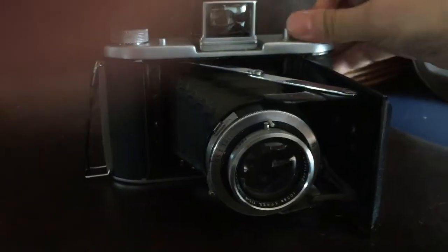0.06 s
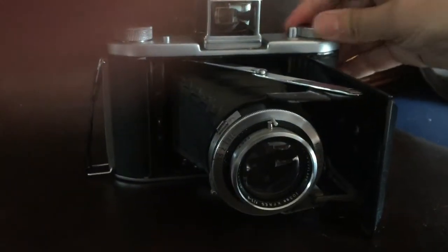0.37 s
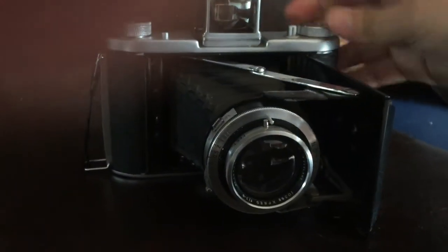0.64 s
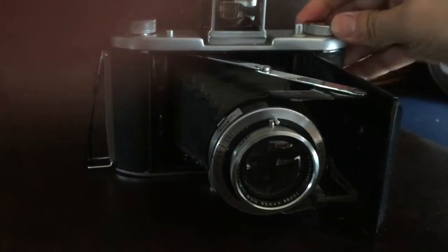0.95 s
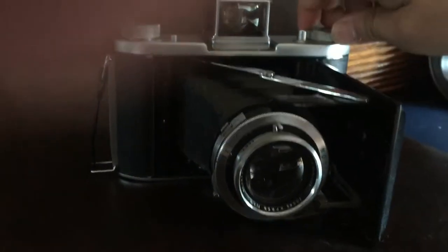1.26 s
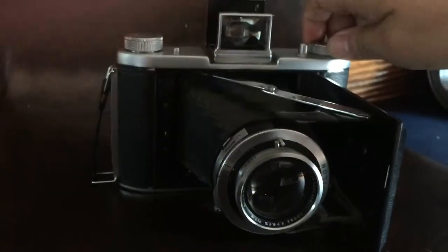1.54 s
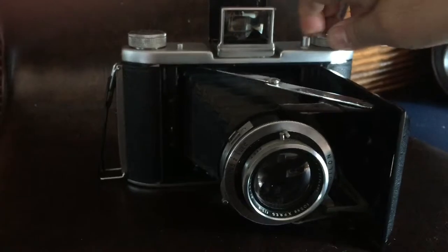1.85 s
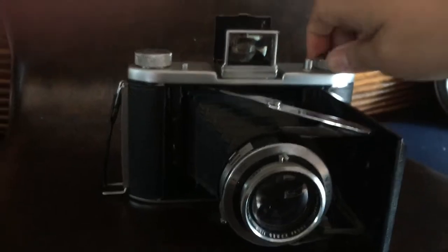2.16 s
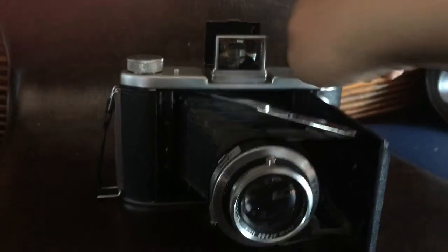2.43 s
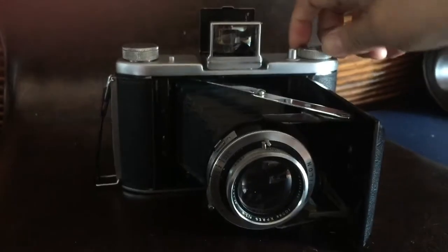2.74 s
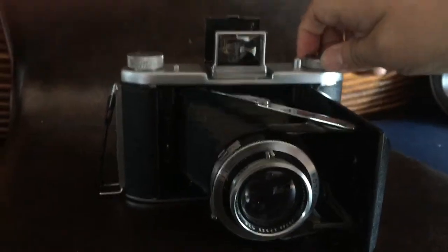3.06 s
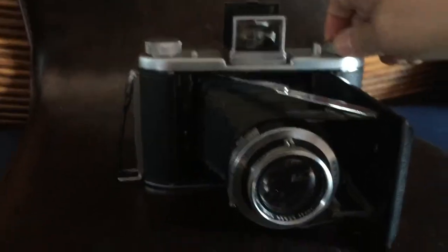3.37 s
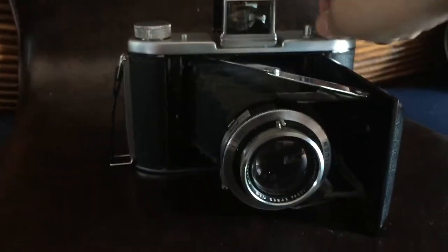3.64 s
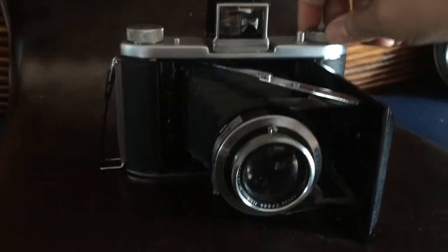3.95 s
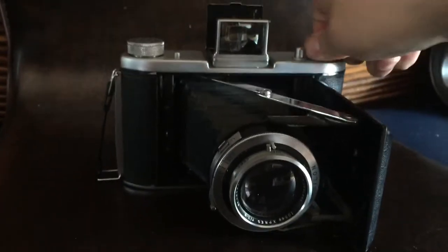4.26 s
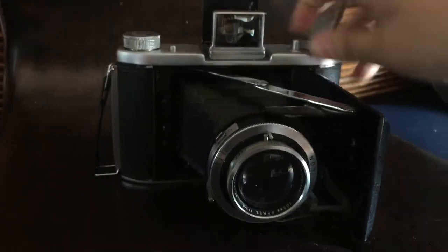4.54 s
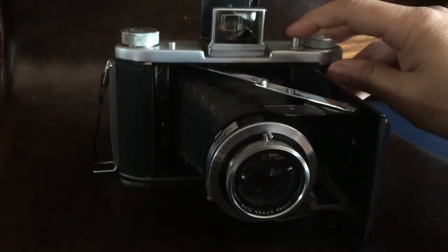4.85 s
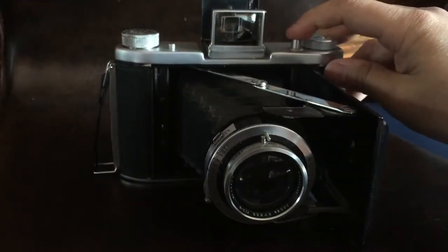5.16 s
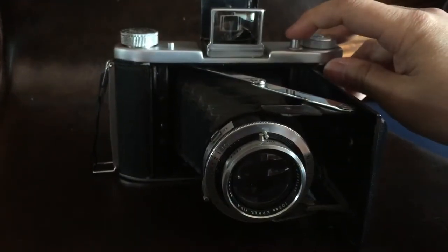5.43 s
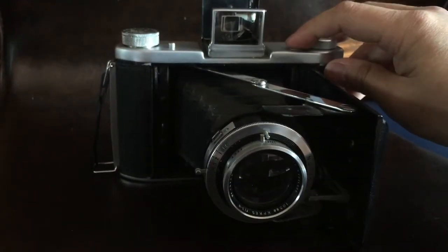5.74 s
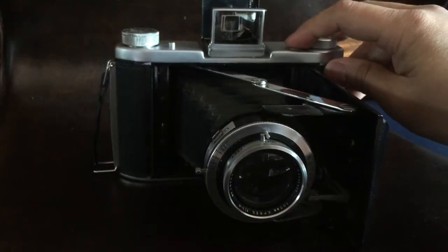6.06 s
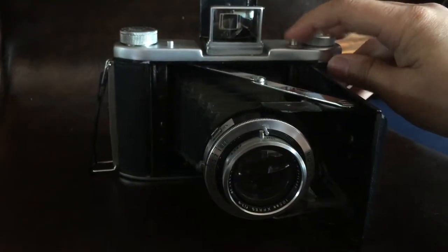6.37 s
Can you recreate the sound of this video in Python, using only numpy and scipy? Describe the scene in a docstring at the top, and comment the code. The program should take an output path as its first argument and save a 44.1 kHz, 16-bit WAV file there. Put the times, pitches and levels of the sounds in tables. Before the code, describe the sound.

Close, quiet handling of an old camera on a table, with small clicks, scrapes and knocks leading to a sharp mechanical shutter release.

```python
"""Soft rubs, scrapes and metal ticks come first: fingers wind the knob of an old folding camera,
close by in a quiet room. The body bumps, rocks and drags on the table. Near the end the shutter
blades snap open, a tiny clockwork timer (the escapement) buzzes, and the blades snap shut.
The gears run back, then the release button springs back with a click and a faint ring."""
import sys
import numpy as np
from scipy import signal
from scipy.fft import rfft, irfft
from scipy.io import wavfile
from scipy.ndimage import uniform_filter1d

SR = 44100
rng = np.random.default_rng(int(sys.argv[2]) if len(sys.argv) > 2 else 0)


def generate_wav(signal):
    """Clip the signal to [-1, 1] and save it as 16-bit WAV at the path in sys.argv[1]."""
    frames = np.transpose(np.atleast_2d(signal))
    scaled = np.clip(frames, -1, 1) * 32767
    pcm = np.round(scaled).astype(np.int16)
    wavfile.write(sys.argv[1], SR, pcm)


N = 291060
TIME = np.arange(N) / SR


def amp(db):
    """Turn decibels into a number to multiply by."""
    return 10 ** (np.asarray(db) / 20)


def evened(x):
    """Scale a sound to an average (rms) level of one."""
    return x / np.sqrt(np.mean(x ** 2) + 1e-20)


def value_at(points, hz):
    """Join (Hz, value) points into a curve and look up the given pitches."""
    point_hz, values = np.transpose(points)
    return np.interp(np.log(hz + 1), np.log(point_hz), values)


def coloured(x, points):
    """Shape a sound's tone with (Hz, dB) points, then even its level."""
    gain = amp(value_at(points, np.fft.rfftfreq(len(x), 1 / SR)))
    return evened(irfft(rfft(x) * gain, len(x)))


def add(mix, start_s, sound):
    """Add a sound into the mix at the given time."""
    part = mix[max(round(start_s * SR), 0):][:len(sound)]
    part += sound[:len(part)]


def background(air_db=-61, hum_hz=59, hum_width_hz=9, hum_db=-66):
    """Faint room air with a low, unsteady hum."""
    # The tone of the air. Each row: pitch in Hz, relative level in dB.
    air_tone = [(12, -61.5), (20, -32), (39, -8.5), (60, 1.5), (77, -5), (91, -22), (123, -10.5),
                (177, -25), (499, -26.5), (624, -27.5), (678, -29.5), (759, -29), (1030, -27),
                (1290, -29.5), (16000, -46.5)]
    hz = np.fft.rfftfreq(N, 1 / SR)
    hum_band = np.exp(-((hz - hum_hz) / hum_width_hz) ** 2)
    hum = irfft(rfft(rng.standard_normal(N)) * hum_band, N)
    return amp(air_db) * coloured(rng.standard_normal(N), air_tone) + amp(hum_db) * evened(hum)


def housing_ring(ring_db, scatter_db=0, part_notes=()):
    """One click and the ring it leaves in the metal; the mix of notes depends on where it is struck."""
    # The housing's notes. Each row: pitch in Hz, dB above the click, seconds to fade by 60 dB.
    housing = [(916, 7, .025), (1740, 9, 0.038), (1867.5, 14, 0.033), (1900, -2, .24), (2125, 3, 0.038),
               (2180, -2.5, 0.35), (2273, 8.5, 0.035), (3120, 4.5, 0.026), (3580, -0.5, 0.037),
               (3795, 8.5, 0.027), (4000, 1, 0.024), (4300, 6.5, .025), (4760, -3.5, 0.057),
               (5357, 1, 0.028), (5470, 2, .04), (8370, 4.5, 0.0074), (8880, 10, .012), (12520, 3, 0.0052)]
    t = TIME[:SR // 5]
    response = signal.unit_impulse(len(t))
    shifts_db = ring_db + scatter_db * rng.standard_normal(len(housing))
    notes = [(hz, db + shift, fade_s) for (hz, db, fade_s), shift in zip(housing, shifts_db)]
    for hz, db, fade_s in notes + list(part_notes):
        damping = np.log(1000) / fade_s
        response += amp(db) * 2 * damping / SR * np.exp(-damping * t) * np.cos(2 * np.pi * hz * t)
    return response


def slips(per_s, spread_db, hiss):
    """Friction: tiny slips of uneven size over a smooth hiss."""
    size = amp(spread_db * np.minimum(rng.exponential(1, N), 4))
    slipping = rng.random(N) < per_s / SR
    return evened(size * slipping * rng.choice([-1., 1.], N)) + hiss * rng.standard_normal(N)


def stroke(start, length, attack_s=0.018, sag_db_per_s=21.5, release_s=0.02):
    """The pressure of one sliding movement: it swells, slackens and lets go."""
    t = np.maximum(TIME - start, 0)
    swell = np.minimum(t / attack_s, 1)
    let_go = np.exp(-np.clip(t - length, 0, 1) / release_s)
    return swell * amp(-sag_db_per_s * t) * let_go


def rubbing():
    """Dragging and gripping the body gives a dull, lumpy rub."""
    # The tone of the rub. Each row: pitch in Hz, relative level in dB.
    rub_tone = [(30, -4.5), (70, 9.5), (150, 8.5), (300, 4.5), (500, -17), (750, -28.5), (1200, -30.5),
                (3000, -45.5)]
    return coloured(slips(per_s=110, spread_db=4, hiss=0.66), rub_tone)


def scraping(tilt_db, pivot_hz=2500):
    """Fine slips at the knob make the metal ring; a harder edge sounds brighter."""
    # The tone of the scrape. Each row: pitch in Hz, relative level in dB.
    scrape_tone = [(150, -24), (500, -4), (900, -0.5), (1900, -1.5), (3500, -2.5), (6500, -7.5),
                   (10000, -14), (16000, -14.5)]
    friction = slips(per_s=6000, spread_db=2, hiss=1)
    grains = signal.fftconvolve(friction, housing_ring(ring_db=-5))[:N]
    hz, t, spectrum = signal.stft(coloured(grains, scrape_tone), SR, nperseg=256)
    octaves = np.log2(np.maximum(hz, 900) / pivot_hz)[:, None]
    gain = amp(octaves * np.interp(t, TIME, tilt_db))
    power = np.mean(abs(spectrum) ** 2, axis=1, keepdims=True)
    gain /= np.sqrt((power * gain ** 2).sum(0) / power.sum())  # brighter, but no stronger
    return signal.istft(spectrum * gain, SR)[1][:N]


def fingers(grip_rub_db=-72.5, grip_scrape_db=-83.5):
    """Each stroke rubs the body and scrapes the knob; the resting hand does both faintly."""
    # Finger strokes. Each row: start and length in seconds, rub and scrape levels in dB,
    # brightness in dB per octave.
    strokes = [(-.02, 0.0372, -122, -60, 1.5), (0.027, 0.089, -67, -55, 0.5),
               (.205, 0.052, -53.5, -58, -7.5), (0.293, 0.078, -48, -73, -5), (.435, 0.092, -64, -58, 0.5),
               (0.504, 0.097, -49.5, -56, -6), (0.659, 0.057, -50.5, -58, -6),
               (1.305, 0.066, -48, -71.5, -4), (1.468, 0.036, -52.5, -59.5, -1.5),
               (1.528, 0.34, -67.5, -75.5, -6), (1.843, 0.065, -60.5, -66, -1.5),
               (2.036, 0.04, -53, -68, -12), (2.157, 0.246, -61, -67, -3.5), (2.395, 0.15, -47.5, -59, -4),
               (2.637, 0.13, -76, -69.5, 0.5), (2.932, 0.33, -59, -78, -2), (3.229, 0.085, -50, -66, 0.5),
               (3.326, 0.11, -51.5, -79, -11), (3.488, .15, -50.5, -79, -9), (3.72, 0.119, -69, -83, 4),
               (4.038, 0.02, -64.5, -77, 0), (4.138, 0.26, -70, -71.5, -0.5), (4.543, 0.18, -66.5, -67, 1),
               (5.172, 0.077, -62, -62.5, -7), (5.71, .025, -57, -48, -2), (6.455, .04, -60, -52, -1),
               (6.496, 0.08, -60, -61, -1.5)]
    pressure = np.array([stroke(start, length) for start, length, *_ in strokes])
    rub_db, scrape_db, tilt_db = np.transpose(strokes)[2:]
    rub = amp(rub_db) @ pressure + amp(grip_rub_db)
    scrape = amp(scrape_db) @ pressure + amp(grip_scrape_db)
    brightness = (tilt_db * amp(scrape_db)) @ pressure / scrape
    return rub * rubbing() + scrape * scraping(brightness)


def contact(blow, ring_db, part_db, scatter_db, rattle_db, rattle_ms=8, part_fade_s=0.03):
    """Metal hits metal: gritty chatter and a faint rattle ring the housing and the struck part."""
    rise_ms, decay_ms, db, hz, below_db, above_db = blow
    # The borders in Hz between the bands of a click, from bass to treble.
    edges_hz = [150, 780, 1550, 2800, 6500, 11000, 16000]
    ring = housing_ring(ring_db, scatter_db, [(hz, part_db, part_fade_s)])
    ms = TIME[:len(ring)] * 1000
    after = np.maximum(ms - rise_ms, 0)
    dying = np.exp(-after / decay_ms) + amp(rattle_db) * np.exp(-after / rattle_ms)
    force = np.minimum(ms / rise_ms, 1) ** 2 * dying
    grit_db = evened(uniform_filter1d(rng.standard_normal(len(ms)), size=40))
    chatter = force * amp(grit_db) * rng.standard_normal(len(ms))
    burst = signal.fftconvolve(chatter, ring)[:len(ms)]
    out = np.zeros(len(ms))
    for low, high in zip(edges_hz, edges_hz[1:]):  # bands near the part's pitch are loudest
        octaves = np.log2(np.sqrt(low * high) / hz)
        fall_db = max(-octaves * below_db, octaves * above_db)
        band = signal.sosfilt(signal.butter(4, [low, high], "band", fs=SR, output="sos"), burst)
        level_over_10ms = np.sqrt(np.sum(band ** 2) / (0.01 * SR))
        out += amp(db - fall_db) * band / level_over_10ms
    return out


def clicks(rows, ring_db, part_db, rattle_db):
    """Play a list of contacts, each at its own spot on the metal."""
    out = np.zeros(N)
    for start, *blow in rows:
        add(out, start, contact(blow, ring_db, part_db, scatter_db=1, rattle_db=rattle_db))
    return out


def handling_ticks():
    """The knob, levers, fingernails and release button tick against metal."""
    # Small contacts. Each row: start in seconds, rise and decay in ms, level in dB, pitch in Hz,
    # fall below and above that pitch in dB per octave.
    ticks = [(.068, 4, 2.4, -49, 1940, 11, 9), (.0997, 1.35, 2.3, -30, 6070, 12.5, 22.5),
             (.1527, 0.71, 4, -44, 1760, 17.5, 35), (.2439, 0.2, 3.1, -28.5, 3450, 9, 13),
             (.5017, 0.72, 4.7, -39.5, 2100, 3.5, 4.5), (.536, 1.1, 1.9, -26.5, 5340, 6.5, 11.5),
             (.6475, 1.3, 10, -50, 1390, 7, 8.5), (.6694, 0.244, 2.6, -40, 4077, 5, 15),
             (.6902, 0.41, 3.2, -36, 1780, 9, 12), (.7047, 2.7, 1.8, -40.5, 1750, 9, 12.5),
             (.8917, 3.45, 4, -64, 3500, 9, 16), (1.28, 14.3, 5.7, -51, 940, 5, 5.5),
             (1.8967, 3.5, 5.4, -61, 6000, 5, 5), (2.032, 11, 10, -51.5, 2180, 4, 7),
             (2.041, 4.3, 3.2, -48, 8840, 26, 34), (2.0857, 6.4, 8, -54.5, 2600, 4, 10.5),
             (2.411, 4.66, 4.1, -37.5, 1335, 2.5, 11.5), (2.4735, 1.47, 2.3, -52.5, 1200, 2, 14),
             (2.539, 6.5, 3, -54, 1980, 11, 10), (2.6587, 1.6, 3.9, -62.5, 4444, 4, 15.5),
             (2.6837, 2.2, 4, -62.5, 4470, 8, 10.5), (3.7357, .3, .9, -68.5, 7070, 11, 10),
             (3.8137, 3.3, 9.6, -50.5, 990, 10, 11), (4.0257, 5.6, 16, -50, 1650, 7, 8),
             (4.586, 3.4, 2.3, -46, 2270, 7.5, 8.5), (4.5957, 0.91, 5.44, -43, 1360, 10.5, 10),
             (4.6478, 0.46, 2, -41, 2050, 17, 7.5), (4.6537, 1.2, 5.9, -49.5, 2100, 4, 4.5),
             (4.7027, 5.4, 5.3, -52.5, 4990, 6, 8), (5.1757, 0.33, 1.7, -41, 1370, 5, 8.5),
             (5.6787, 7, 12.7, -56, 1650, 2.5, 8), (6.4835, 5.2, 6.67, -34.5, 2350, 10, 4),
             (6.4934, 2.1, 2.94, -35.5, 2350, 4.5, 3.5)]
    return clicks(ticks, ring_db=-12, part_db=4.5, rattle_db=-27)


def bumps(bass_share=0.56, spread_ms=1.95):
    """Bending waves carry treble faster than bass, so each bump is a quick falling chirp."""
    # Knocks on body and table. Each row: time in seconds, peak in dB, centre pitch in Hz,
    # softness (higher means less treble).
    knocks = [(0.223, -44, 345, 4.8), (.301, -31.5, 223.4, 3.3), (.311, -35, 167, 4), (.338, -41.5, 230, 5),
              (0.368, -46, 140, 5), (.443, -42.5, 151, 2.6), (.536, -36, 150, 0.8), (1.333, -34, 200, 5.5),
              (1.34, -31, 243, 3.11), (1.463, -46, 170, 6.4), (1.497, -39.5, 94, 8.2),
              (1.916, -44.5, 161, 4.2), (2.05, -41, 70, 4.5), (2.419, -36.5, 228, 8.4),
              (2.466, -38.5, 210, 2.5), (2.662, -46, 160, 6.8), (3.191, -34, 128, 3.37),
              (3.2452, -27.5, 340, 2), (3.2575, -16.5, 193, 1.456), (3.523, -43, 137.1, 11),
              (3.61, -39, 170, 3.9), (5.1762, -14.5, 1450, 4.05), (5.178, -37, 240, 1.36),
              (5.188, -39.5, 220, 1.7), (5.737, -20.5, 225, 1.7), (5.82, -39.5, 260, 1.3),
              (6.252, -52.5, 120, 4.5), (6.496, -54, 336, 2.6), (6.566, -49, 130, 3)]
    out = np.zeros(N)
    hz = np.fft.rfftfreq(8192, 1 / SR)
    for at, db, centre_hz, softness in knocks:
        smear_ms = spread_ms * (200 / centre_hz) ** 0.35  # deeper knocks last longer
        ratio = hz / centre_hz
        gain = ratio ** (bass_share * softness) / (1 + ratio ** ((1 + bass_share) * softness))
        lag_turns = 2 * smear_ms * np.sqrt(hz / 1000)
        chirp = np.fft.fftshift(irfft(gain * np.exp(-2j * np.pi * lag_turns)))
        add(out, at - len(chirp) / 2 / SR, amp(db) * chirp / abs(chirp).max())
    return out


def rings(rows, rise_s):
    """Pure notes that swell briefly and die away."""
    out = np.zeros(N)
    t = TIME[:SR]
    for start, db, hz, fade_s in rows:
        envelope = np.minimum(t / rise_s, 1) * np.exp(-np.log(1000) * t / fade_s)
        add(out, start, amp(db) * envelope * np.sin(2 * np.pi * hz * t))
    return out


def rocking():
    """The camera rocks on its stand with a deep, short note."""
    # Each row: start in seconds, level in dB, pitch in Hz, seconds to fade by 60 dB.
    wobbles = [(0.376, -44, 66, 0.26), (0.574, -50, 107, 0.19), (.700, -42, 83, 0.12),
               (3.262, -32.5, 58.1, 0.17), (4.711, -42, 58.7, 0.35)]
    return rings(wobbles, rise_s=0.014)


def struts():
    """Struts and levers ring on after a snap."""
    # Each row: start in seconds, level in dB, pitch in Hz, seconds to fade by 60 dB.
    strut_notes = [(.538, -65.5, 675.6, 1.54), (.7055, -27, 3236, 0.025), (5.74, -69, 670, 3.4)]
    return rings(strut_notes, rise_s=0.00097)


def rasp(start, length, db, first_hz, last_hz, width_hz):
    """A part sticks and slips, making a rough note that glides as it settles."""
    noise = rng.standard_normal(N) + 1j * rng.standard_normal(N)
    roughness = signal.sosfilt(signal.butter(3, width_hz / 2, fs=SR, output="sos"), noise)
    hz = np.interp(TIME, [start, start + length], [first_hz, last_hz])
    tone = np.exp(2j * np.pi * np.cumsum(hz) / SR)
    return amp(db) * stroke(start, length) * evened((roughness * tone).real)


def dragging():
    """The body sticks and slips on the table after its big bump."""
    # Each row: start and length in seconds, level in dB, first pitch, last pitch and width in Hz.
    slides = [(3.267, .12, -59, 570, 469, 330), (3.405, 0.097, -53.5, 440, 391.5, 327)]
    return sum(rasp(*row) for row in slides)


def shutter_blades():
    """The blades strike three times as they open and four times as they close."""
    # Blade strikes. Each row: start in seconds, rise and decay in ms, level in dB, pitch in Hz,
    # fall below and above that pitch in dB per octave.
    strikes = [(5.7322, .7, 2.6, -23, 3000, 8, 4), (5.7384, .3, 1.7, -19, 9050, 4.9, 1.5),
               (5.741, .4, 1.3, -27.5, 2270, 6, 1), (5.8055, 2.4, 1.8, -30.5, 4300, 11.5, 7),
               (5.813, .5, 2.4, -17, 3050, 14.4, 7), (5.8188, .8, 2, -23.5, 3800, 8.1, 5),
               (5.8227, .7, 1.8, -28, 1884, 31, 8)]
    return clicks(strikes, ring_db=1.5, part_db=-6, rattle_db=-24.5)


def escapement(weak_tick_db=-6):
    """A lever rocks on a toothed wheel: a strong and a weak tick per tooth, quickening at the end."""
    # The wheel's speed. Each row: time in seconds, teeth per second.
    wheel_speed = [(5.747, 137), (5.789, 137), (5.805, 195)]
    # One tick of the lever: rise and decay in ms, level in dB, pitch in Hz,
    # fall below and above that pitch in dB per octave.
    lever_blow = (0.14, 3.1, -38, 5448.5, 7.5, 8)
    times, rates = np.transpose(wheel_speed)
    t = np.arange(times[0], times[-1], 1 / SR)
    tick_count = np.floor(2 * np.cumsum(np.interp(t, times, rates)) / SR)
    out = np.zeros(N)
    for k, start in enumerate(t[np.diff(tick_count, prepend=-1) > 0]):
        tick = contact(lever_blow, ring_db=-2, part_db=3, scatter_db=0, rattle_db=-36)
        add(out, start, amp(weak_tick_db * (k % 2)) * tick)
    return out


def gears():
    """The shutter's gears run back with a short, rising rasp."""
    return rasp(start=5.855, length=0.07, db=-58, first_hz=1950, last_hz=2200, width_hz=600)


def release_spring(start_s=6.4934):
    """The release linkage and its spring ring on after the button hits its stop."""
    # Each row: pitch in Hz, level in dB, seconds to fade by 60 dB.
    spring_notes = [(312, -38, .1), (440, -43, .12), (1017, -44, .14), (1400, -52, .2), (1766, -52, .27),
                    (2153, -57, .4), (2702, -49.5, .66), (4000, -50, .35), (5943, -55, .22)]
    return rings([(start_s, db, hz, fade_s) for hz, db, fade_s in spring_notes], rise_s=0.00067)


def room(x, build_s=0.0027):
    """A small furnished room answers with a short, smooth echo."""
    # How long the echo lasts. Each row: pitch in Hz, seconds to fade by 60 dB.
    fade_times = [(150, 0.17), (1000, .33), (2200, 0.23), (6000, 0.27), (15000, 0.29)]
    hz, t, spectrum = signal.stft(rng.standard_normal(SR // 2), SR, nperseg=256)
    fade = np.exp(-np.log(1000) * t / value_at(fade_times, hz)[:, None])
    tail = signal.istft(spectrum * fade, SR)[1]
    tail *= np.minimum(TIME[:len(tail)] / build_s, 1) ** 2
    return signal.fftconvolve(x, tail / np.linalg.norm(tail))[:N]


def scene(handling_echo_db=-16, shutter_echo_db=-21):
    """All the sounds of the camera, with a little of the room."""
    handling = handling_ticks() + release_spring()
    shutter = shutter_blades() + escapement()
    knocks = bumps()
    body = rocking() + struts()
    friction = fingers() + dragging() + gears()
    echo = room(amp(handling_echo_db) * (handling + knocks) + amp(shutter_echo_db) * shutter)
    return (handling + shutter + knocks + body + friction + echo + background())[None]


def record(dry, low_cut_hz=38, ceiling=0.85, high_cut_hz=16150):
    """The deep bass is thinned, the hardest snap clips, and the top treble is cut off."""
    thinned = signal.sosfilt(signal.butter(2, low_cut_hz, "high", fs=SR, output="sos"), dry)
    clipped = np.clip(thinned, -ceiling, ceiling)
    treble_cut = signal.firwin(401, high_cut_hz, window=("kaiser", 8), fs=SR)
    return signal.oaconvolve(clipped, treble_cut[None], "same")


dry = scene()
out = record(dry)
generate_wav(out)
```